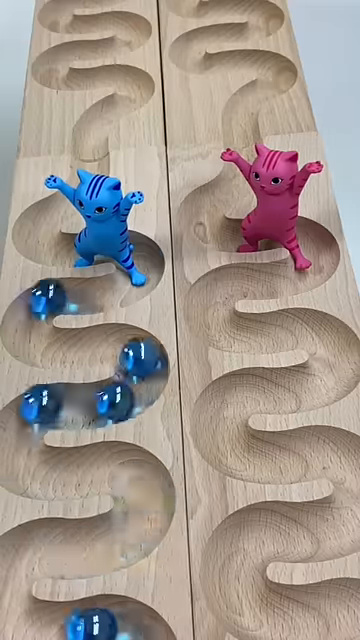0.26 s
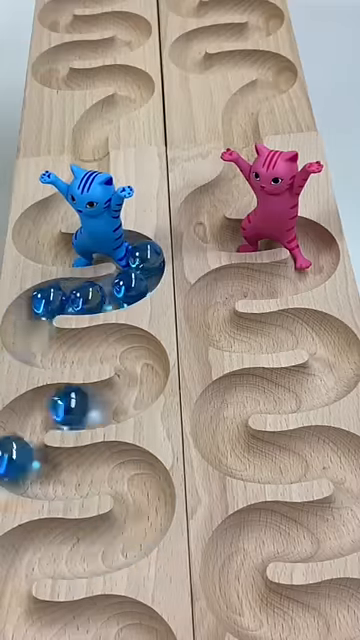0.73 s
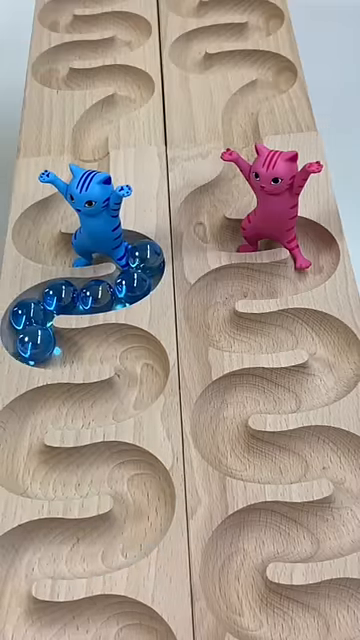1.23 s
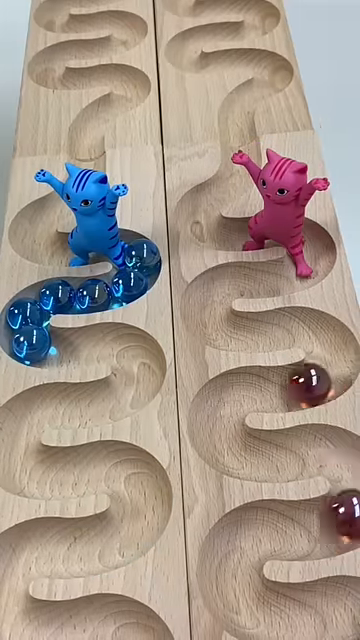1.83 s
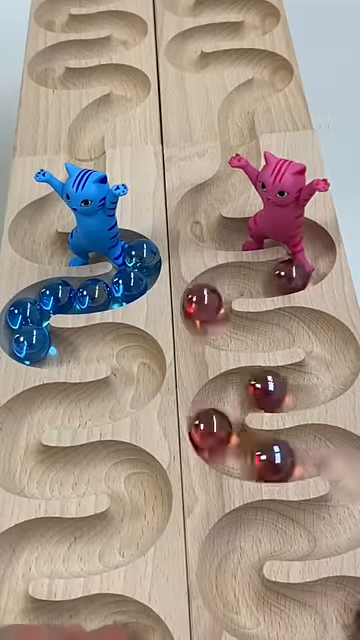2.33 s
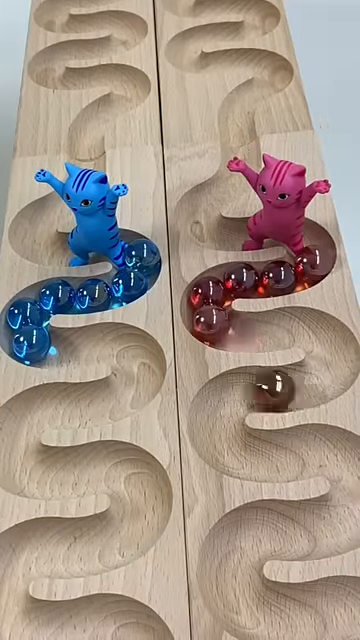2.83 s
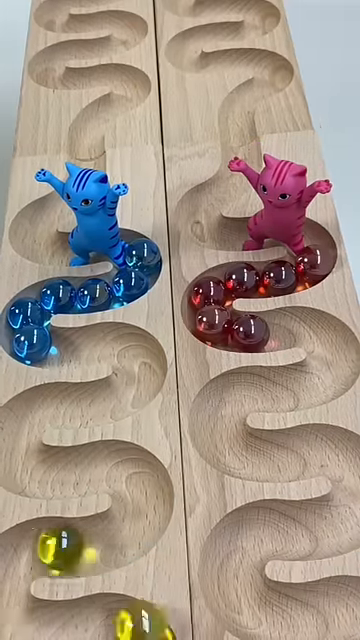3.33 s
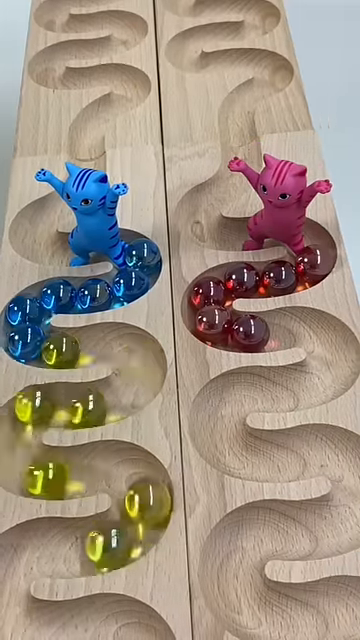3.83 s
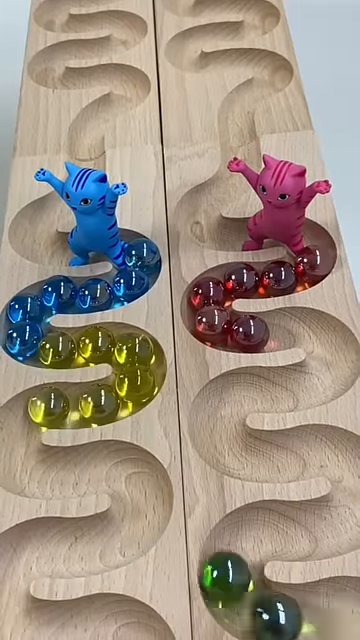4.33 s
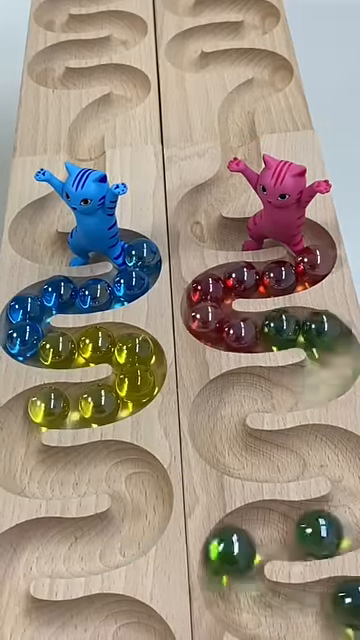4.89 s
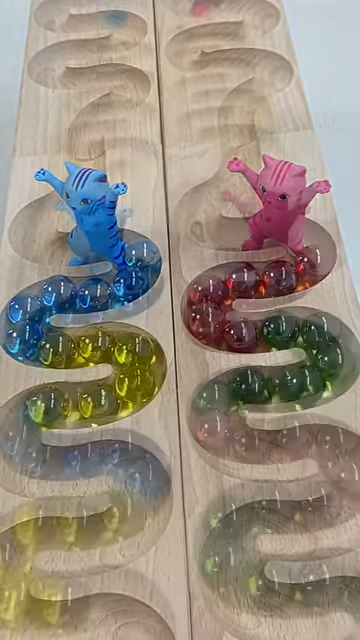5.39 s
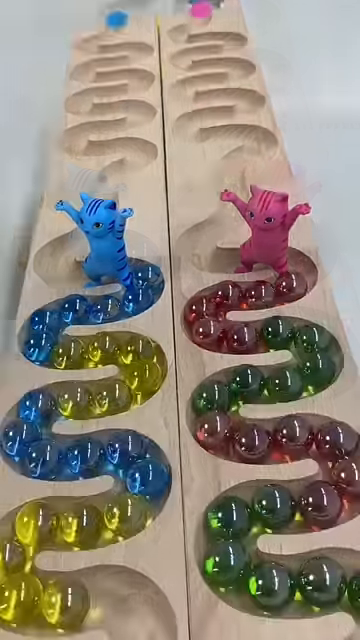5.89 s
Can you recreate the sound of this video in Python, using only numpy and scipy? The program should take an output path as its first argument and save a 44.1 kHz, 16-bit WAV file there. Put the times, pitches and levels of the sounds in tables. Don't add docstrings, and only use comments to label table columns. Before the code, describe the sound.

Close, dry clatter of glass marbles rolling through carved wood, snapping against each other in bursts, then fading into low quiet room air.

```python
import sys
import numpy as np
from scipy import signal
from scipy.fft import rfft, irfft
from scipy.io import wavfile
from scipy.ndimage import uniform_filter1d

SR = 44100
rng = np.random.default_rng(int(sys.argv[2]) if len(sys.argv) > 2 else 0)


def wav_record(signal):
    frames = np.transpose(np.atleast_2d(signal))
    bounded = np.clip(frames, -1, 1)
    quanta = np.round(bounded * 32767).astype(np.int16)
    wavfile.write(sys.argv[1], SR, quanta)


def gain_from_db(level_db):
    decades = np.asarray(level_db, float) / 20
    return 10 ** decades


N = 271215

# frequency in Hz, level in dB per Hz.
AIR = [(25, -64), (76, -11), (113, 10.5), (554, -52), (700, -1.5), (940, -32.5), (4500, -40),
       (14000, -60.5)]
AIR_DB = -58
# frequency in Hz, level in dB per Hz.
LATE_AIR = [(60, -21), (110, -4), (200, -17), (340, -14), (700, -27), (1500, -38), (5000, -41),
            (15000, -66.5)]
LATE_DB, LATE_S = -59, 5.21
LULL_S, LULL_LENGTH_S, LULL_DB = 5.86, 0.038, -3
# time in seconds, level in dB.
THROB = [(5.401, -66), (5.779, -67), (5.821, -55), (5.92, -56.5), (5.969, -70.5), (6.019, -53), (6.15, -59)]
# frequency in Hz, level in dB per Hz.
PORT_AIR = [(100, -7), (800, -4), (3000, -17.5), (11000, -34), (13000, -22), (15500, -36)]
PORT_AIR_DB = -73.5
# frequency in Hz, decay by 60 dB in seconds.
ROOM = [(200, 0.48), (1000, 0.12), (4000, 0.089), (12000, 0.11)]
# frequency in Hz, decay by 60 dB in seconds.
HALL = [(500, 0.2), (3500, 0.13), (12000, 0.3)]
HALL_DB = -30
# frequency in Hz, difference of the ports relative to their sum in dB.
WIDTH = [(100, -29), (400, -23.5), (1000, -14), (1500, -13.5), (2500, -18.5), (6000, -8.5), (10000, -4),
         (14000, 10)]
# frequency in Hz, gain in dB.
MICROPHONE = [(40, -40.5), (140, -11), (210, 1), (12000, -0.5), (13500, -22), (15000, -42), (18000, -58.5)]

BOARD_CHANGES = [1.25, 3.05, 4.15]
# frequency in Hz, bandwidth in Hz, level in dB.
BOARD = [
    [(230, 110, 6), (312.3, 96, 17.5), (382, 38, 8.5), (438, 26, 8), (638, 28, 9), (730, 30, 2),
     (849, 24, 7), (920, 29, 4), (1008, 50, 9.5), (1156, 100, 10), (1271, 25, 10), (1410, 140, 6.5)],
    [(230, 59, 9.5), (305, 30, 12.5), (376, 110, 15.5), (497.7, 48, 12), (543, 110, 7.5), (647, 40, 9.5),
     (854, 50, 6), (1030, 50, 3), (1190, 40, 7.5), (1310, 33, 8), (1434, 88, 6.5), (1560, 320, 3)],
]
# frequency in Hz, bandwidth in Hz, level in dB.
LEFT_WALL = [(2031, 84, 6.5), (2350, 320, 9), (2720, 310, 2), (3396, 150, 6.5), (3670, 1500, -5),
             (1520, 340, -8)]
# frequency in Hz, bandwidth in Hz, level in dB.
RIGHT_WALL = [(2043, 170, 5.5), (2400, 300, 5), (2980, 640, 8.5), (3290, 190, 3.5), (3850, 780, -2),
              (1600, 400, -2)]
WALLS = [LEFT_WALL, RIGHT_WALL]
# frequency in Hz, bandwidth in Hz, level in dB.
GROOVE = [
    [(5000, 100, 2.5), (5480, 130, -0.5), (6720, 270, 6.5), (7750, 915, -24), (9710, 73, -14)],
    [(5170, 200, -10), (5520, 870, 4), (6080, 83, -6.5), (7600, 1400, -26.5), (9000, 450, -12)],
]

# start in seconds, peak in dB.
PRICKS = [(0.7694, -38), (0.8676, -32), (1.1696, -42.5), (1.4229, -33), (1.6821, -31), (1.7057, -25),
          (1.91, -22), (2.161, -55), (2.4562, -24.5), (2.4644, -47), (2.6356, -33), (2.683, -36),
          (2.703, -20), (3.5433, -29), (4.0574, -28), (4.4982, -49), (4.5451, -33), (4.5877, -19),
          (4.6853, -51), (5.2478, -45), (5.3537, -49)]
# start in seconds, level in dB, thump relative to it in dB.
BUMPS = [(2.851, -36, -6), (2.902, -44, -2.5), (2.935, -38.5, -10), (2.953, -37, -11), (2.997, -40, -4.5),
         (3.131, -37, -9), (3.216, -59.5, -16.5), (3.375, -33, -14), (3.459, -34, -7), (5.398, -44, -7.5),
         (5.433, -59, -1), (5.468, -58, -5), (5.58, -60, -12.5), (5.635, -63, -10), (4.806, -45, -13)]
# frequency in Hz, bandwidth in Hz, level in dB.
BUMP_RING = [(1250, 300, -2.5), (2000, 350, 3.5), (2700, 350, -2), (3400, 400, -8), (4180, 800, -15),
             (6800, 500, -14)]
# start in seconds, peak in dB, brightness in dB.
TICKS = [(0.0166, -28, -12), (0.036, -34, -4), (0.055, -32, -11), (0.0992, -24.5, -7), (0.2283, -24.5, -5),
         (0.2434, -25.5, -2), (0.301, -25.5, 2.5), (0.3414, -29, -2), (0.6767, -28.5, -16),
         (0.747, -44, -8), (0.782, -32, -11), (0.816, -30.5, 2), (0.8758, -27, 0), (0.9862, -40, -12.5),
         (1.394, -34, -5), (1.4073, -37, -4), (1.444, -24, -14), (1.4782, -30.5, -14), (1.6104, -21, -6),
         (1.6717, -25, -4), (1.695, -20, -7), (1.7496, -27, 2), (1.7665, -21, -7), (1.8617, -26, 0),
         (1.9068, -23, -1.5), (1.92, -22, 5), (1.9454, -37, -4), (1.9793, -28, 2), (2.0256, -34, -2),
         (2.1092, -23, -1.5), (2.14, -24, -20), (2.2328, -25.5, -13), (2.2483, -29, -4), (2.2697, -27, -6),
         (2.3384, -26, -4), (2.3813, -25, 0), (2.3977, -23, 4), (2.4848, -37, 2), (2.5058, -29, -2),
         (2.5336, -48, -3), (2.567, -34, -9), (2.7966, -29, -6), (3.513, -25.5, -9), (3.616, -30, -13),
         (3.6541, -40, -10), (3.694, -38.5, -12), (3.7824, -31.5, 1), (3.8214, -30, -5), (3.9544, -45, -8),
         (4.308, -30, -1), (4.4084, -27, -2), (4.4257, -23.5, 0), (4.481, -32, -1), (4.535, -28, -11),
         (4.569, -33, -1), (4.717, -35, 0), (4.782, -35, -8), (5.164, -30, -2), (5.1802, -25, -4),
         (5.223, -29, 5)]
# start in seconds, level in dB, brightness in dB.
KNOCKS = [(0.1114, -33, 0), (0.209, -42, 11), (0.2505, -38.5, 5), (0.3166, -40.5, 10.5), (0.896, -34, -3),
          (0.919, -30.5, -2), (1.0085, -37, -6.5), (1.7013, -32, 2), (1.7261, -30.5, -3), (1.8812, -47, 16),
          (1.961, -32, 1.5), (2.0017, -32, -13), (2.322, -27.5, -30), (2.4264, -30.5, 1.5), (2.463, -33, 0),
          (2.584, -31.5, -5), (2.857, -39.5, 14), (3.003, -31.5, -4), (3.2855, -25.5, -13),
          (3.759, -34.5, -4), (3.8586, -33, -1), (4.0356, -24, -12), (4.3307, -31, 0), (4.42, -35, 3),
          (4.5194, -38.5, -4), (4.685, -42.5, 18), (4.923, -25, -8), (5.15, -31, -25), (5.31, -28, -4),
          (0.468, -39.5, 1), (0.728, -38.5, -18), (0.793, -39.5, 0), (0.9419, -35.5, -9),
           (1.993, -48.5, 20), (2.3776, -41, 14), (2.407, -35, -22), (2.803, -39, -1), (2.97, -46, -16),
           (3.254, -44.5, -7.5), (3.5525, -47.5, 16.5), (3.593, -43.5, 7.5), (3.9277, -37, -1),
           (4.274, -36.5, 5), (4.3607, -38.5, 10.5), (4.3822, -33.5, 6), (4.4772, -39, 1),
           (4.7512, -34.5, 3.5), (5.107, -36, 6), (5.285, -34.5, 4)]
# start in seconds, level in dB, scatter relative to it in dB.
DROPS = [
    (4.8123, -14, -5),
    (4.929, -13.5, -3),
    (4.993, -18, -2.5),
    (5.03, -25, -2.5),
    (5.049, -30.5, -0.5),
]
# frequency in Hz, gain in dB.
DROP_COLOUR = [(300, -10), (1200, -8), (3300, 2.5), (5500, 2.5), (7000, -7.5), (10000, -5), (13000, -21.5)]
DROP_SNAP_DB = 4

# time in seconds, level in dB.
ROLL = [(0, -40), (0.6, -42.5), (0.8, -45), (1.069, -45), (1.13, -68), (1.299, -61.5), (1.4, -45.5),
        (1.5, -50.5), (1.95, -41), (2.66, -41.5), (2.92, -54), (3.05, -48.5), (3.2, -55.5), (3.499, -41),
        (4.0, -41.5), (4.3, -46), (4.75, -45), (5.319, -43.5)]
STOP_DB_PER_S, STOP_DEPTH_DB, FADE_DB_PER_S = 146.5, 19, 36.5
WALL_RE_ROLL_DB, WALL_SLOPE, FIZZ_RE_WALL_DB = -8, 5.4, -17.5
# time in seconds, rub in dB, length in seconds, brightness in dB.
BENDS = [(0.368, -49, 0.54, -18), (0.64, -55, 0.048, -11.5), (0.893, -51, 0.2, -19), (1.332, -49, 0.012, 9),
         (1.76, -48.5, 0.16, -11.5), (1.92, -52, 0.11, -5), (2.043, -41.5, 0.052, -12),
         (2.343, -48.5, 0.14, -7.5), (2.676, -48.5, 0.19, -19), (3.4, -41, 0.14, 2),
         (3.725, -48.5, 0.3, -15), (3.966, -47.5, 0.25, -12), (4.372, -50, 0.095, -27.5),
         (4.668, -47.5, 0.16, -14), (4.85, -49, 0.18, -4.5), (5.094, -52, 0.27, -3.5),
         (5.284, -55, 0.29, -8.5), (5.593, -72, 0.35, -19)]
# frequency in Hz, level in dB per Hz.
SEETHE = [(1200, -13.5), (3000, -6), (6000, -10.5), (8000, -11.5), (9700, -0.5), (12300, -12.5),
          (13300, -46)]
SEETHE_DB, SEETHE_SLOPE = -74.5, 0.53
SEETHE_TOP_SLOPE, SEETHE_SPLIT_HZ = 2.0, 6500

# start in seconds, level in dB.
SNAPS = [(0.123, -32.5), (0.6858, -36.5), (1.009, -26), (1.0387, -27), (1.088, -35), (1.331, -33),
         (1.4633, -32), (1.9908, -33.5), (2.4257, -29.5), (2.6568, -28), (2.6733, -36), (2.6795, -23),
         (3.0222, -24), (3.2893, -23.5), (3.8364, -28.5), (3.858, -27.5), (3.9715, -24), (3.9883, -42),
         (3.9957, -23), (4.5838, -28), (4.898, -30.5), (4.8827, -31), (4.9408, -31), (4.9977, -36),
         (5.2695, -30.5), (5.309, -23.5), (5.3308, -30), (5.3889, -22.5)]
# frequency in Hz, gain in dB.
SNAP_SUM = [(60, -23), (1500, -9), (4000, -17), (8000, -14), (11000, -6.5), (13000, -8.5), (14500, -17),
            (17000, -49.5)]
# frequency in Hz, gain in dB.
SNAP_DIFF = [(6000, -38.5), (9000, -35), (11500, -15.5), (14000, -7), (16000, -3.5), (17200, -33.5)]
# frequency in Hz, gain in
# dB.
SNAP_TAIL = [(1000, 1), (12500, -2.7), (13600, -23.5), (17000, -35)]
# start in seconds, hollow knock, low, high and upper ring in dB.
LEFT_CLACKS = [(0.0727, -53, -52, -49.5, -78.5), (0.1492, -40, -27.5, -33, -32),
               (0.1753, -41.5, -36.5, -47.5, -47.5), (0.1915, -46.5, -41, -50, -61.5),
               (0.2224, -52, -49, -55, -83), (0.502, -51.5, -58, -52.5, -96),
               (0.529, -44.5, -47.5, -61, -53.5), (3.0905, -41.5, -62.5, -37.5, -42.5),
               (3.0958, -40.5, -36, -41.5, -38.5), (3.3068, -34.5, -28.5, -33, -37),
               (3.3112, -38, -32.5, -44, -49), (3.3264, -41.5, -34, -43.5, -36.5),
               (3.3343, -47, -53, -37, -45), (3.3509, -46, -29.5, -38, -29),
               (3.3637, -47.5, -42, -52, -54.5), (3.382, -39.5, -32, -37, -35),
               (3.3898, -49, -58.5, -48.5, -62), (3.421, -41, -40, -53, -50.5),
               (3.442, -38.5, -36.5, -44.5, -43.5), (3.4731, -56, -39, -48, -48),
               (3.479, -45.5, -41.5, -46, -50), (3.7173, -53, -51, -46, -72), (3.889, -53, -56, -54, -79),
               (4.1193, -41, -62, -52, -58), (4.123, -50, -58, -41, -50), (4.1318, -49, -59, -39.5, -52)]
# start in seconds, hollow knock, low, high and upper ring in dB.
RIGHT_CLACKS = [(1.3351, -42, -48.5, -44, -43), (1.3426, -43, -37.5, -49, -60.5),
                (1.5274, -36.5, -31, -36.5, -28), (1.5641, -37.5, -49, -34.5, -27),
                (1.5882, -44.5, -32.5, -34.5, -51), (1.6016, -40.5, -36.5, -31, -33.5),
                (1.6392, -44, -51, -44.5, -78), (1.7763, -43.5, -35, -54, -39), (1.783, -58, -33, -54, -39),
                (1.8212, -44, -37.5, -39, -46.5), (1.8284, -49, -39.5, -57, -62),
                (2.176, -36, -51, -44, -60), (2.1825, -48, -39, -61, -51),
                (4.1636, -39.5, -31.5, -36.5, -44), (4.1775, -51, -64, -37, -35.5),
                (4.1952, -47, -50, -37.5, -45), (4.2066, -54, -46, -41, -48),
                (4.2164, -48.5, -60, -49.5, -66), (4.5936, -48, -31, -39.5, -32),
                (4.6023, -41, -46.5, -48, -53.5), (4.606, -48, -34.5, -38, -45.5),
                (4.6167, -39, -48.5, -48, -51.5), (4.6296, -46, -40, -52.5, -49)]
# start in seconds, hollow knock in dB, glass snap in dB.
PILE = [(0.38, -21.5, -56), (0.5503, -28, -31), (0.5799, -23.5, -31), (0.6036, -18.5, -21),
        (1.0521, -24.5, -23.5), (1.0777, -25, -26.5), (1.4543, -27.5, -25.5), (2.605, -25, -20.5),
        (2.6308, -22, -27), (2.7068, -21, -21), (2.7241, -24.5, -29.5), (3.0415, -25.5, -30.5),
        (3.061, -20, -24), (3.9856, -23.5, -26.5), (4.0488, -33, -28), (4.1012, -27.5, -20.5),
        (4.91, -23, -25)]
# frequency in Hz, bandwidth in Hz.
CLACK_RINGS = [
    [(2850, 330), (5530, 230), (6700, 290)],
    [(3000, 330), (5620, 260), (6180, 310)],
]
UPPER_RING_HZ = [9700, 9250, 9790, 9220]
UPPER_WIDTH_HZ, QUEUE_KNOCK_HZ = 230, 3150
SNAP_RE_UPPER_DB, CRACK_RE_RING_DB, THUMP_RE_KNOCK_DB = 18, -2.5, -3
PILE_KNOCK_DB, PILE_RING_DB, PILE_TOP_DB = -22.5, -41, -39.5
# frequency in Hz, gain in dB.
CRACK_TICK = [(600, -24.5), (1500, -4.5), (3000, 1.5), (6000, -22), (9500, -15), (12500, -8.5)]


def evened(x):
    return x / np.sqrt(np.mean(x ** 2) + 1e-20)


def read(points, hz):
    f, value = np.transpose(points)
    return np.interp(np.log(hz + 1), np.log(f + 1), value)


def add(mix, s, sound):
    part = mix[round(s * SR):][:len(sound)]
    part += sound[:len(part)]


def causal(points, size=2048):
    hz = abs(np.fft.fftfreq(size, 1 / SR))
    log_gain = np.log(gain_from_db(np.maximum(read(points, hz), -100)))
    return np.fft.ifft(np.exp(log_gain - 1j * signal.hilbert(log_gain).imag)).real[:size // 2]


def colour(x, points):
    return signal.oaconvolve(x, causal(points))[:N]


def noise(points):
    gain = gain_from_db(read(points, np.fft.rfftfreq(N + 1, 1 / SR)))
    return evened(irfft(rfft(rng.standard_normal(N + 1)) * gain)[:N])


def ring(modes, size=3000, rise_s=0.000052, order=1, signs=1):
    t = np.arange(size) / SR
    out = np.zeros(size)
    for k, (hz, width, db) in enumerate(modes):
        decay = np.sqrt(width) * np.exp(-np.pi * width * t)
        out += signs ** k * gain_from_db(db) * decay * np.sin(2 * np.pi * hz * t)
    return (1 - np.exp(-t / rise_s)) ** order * out


def contacts(draw, length_s):
    t = np.arange(len(draw)) / SR
    burst = draw * abs(draw) * np.exp(-t / length_s) * np.minimum(t / (0.48 * length_s), 1)
    return burst / np.linalg.norm(burst)


def board_at(t):
    return np.searchsorted(BOARD_CHANGES, t) % 2


def room(x, decay):
    taps = np.zeros((2, SR // 2))
    at = np.arange(100, SR // 2 - 20, 20) + rng.integers(0, 20, (2, (SR // 2 - 101) // 20))
    np.put_along_axis(taps, at, rng.choice([-1., 1.], at.shape), 1)
    hz, t, z = signal.stft(taps, SR, nperseg=256)
    tail = signal.istft(z * gain_from_db(-60 * t / read(decay, hz)[:, None]), SR, nperseg=256)[1]
    return signal.fftconvolve(x[None], tail / np.linalg.norm(tail[0]), axes=1)[:, :N]


def shifting_room(x, count=4):
    turn = np.arange(N) / SR * 9 % count
    out = np.zeros((2, N))
    for k in range(count):
        distance = abs((turn - k + count / 2) % count - count / 2)
        out += room(x * np.cos(np.pi / 2 * np.minimum(distance, 1)), ROOM)
    return out


def background():
    t = np.arange(N) / SR
    late = np.clip((t - LATE_S) / 0.5, 0, 1)
    lull = gain_from_db(LULL_DB * np.exp(-((t - LULL_S) / LULL_LENGTH_S) ** 2))
    air = gain_from_db(AIR_DB) * noise(AIR) * np.sqrt(1 - late)
    air += gain_from_db(LATE_DB) * noise(LATE_AIR) * np.sqrt(late) * lull
    hiss = noise([(2500, -20.0), (5000, 5.0), (7500, -14.0), (10500, 3.5), (13500, -16.5),
                  (15500, -5.5), (16300, -31.5)])
    air += gain_from_db(np.interp(t, [5.85, 6.06], [-100, -74])) * hiss
    s, db = np.transpose(THROB)
    deep = np.sin(2 * np.pi * 57 * t + 0.82 * np.sin(2 * np.pi * 7 * t))
    return air + deep * gain_from_db(np.interp(t, s, db + 2.5, left=-90))


def drops():
    out, t = np.zeros((2, N)), np.arange(6000) / SR
    for s, db, scatter_db in DROPS:
        envelope = np.exp(-(t / 0.0031) ** 4) + gain_from_db(scatter_db - 60 * t / 0.12)
        for k in range(2):
            scatter = np.convolve(rng.standard_normal(6000), causal(DROP_COLOUR))[:6000]
            add(out[k], s, gain_from_db(db) * envelope * evened(scatter))
        add(out[0], s + 0.0032, gain_from_db(db - 21.0) * evened(ring(BOARD[1], signs=-1)))
    return out


def pricks():
    out = np.zeros(N)
    for s, db in PRICKS:
        add(out, s, gain_from_db(db + 12.5) * contacts(rng.standard_normal(80), 0.00092))
    return out


def bumps():
    out = np.zeros(N)
    for s, db, thump_db in BUMPS:
        uneven = rng.standard_normal(len(BUMP_RING))
        modes = [(hz, w, level + 1.4 * d) for (hz, w, level), d in zip(BUMP_RING, uneven)]
        rings = ring(modes, size=1000, rise_s=0.0001, order=2, signs=-0.9)
        add(out, s, gain_from_db(db - 21.5) * np.convolve(contacts(rng.standard_normal(120), 0.0011), rings))
        thump = evened(ring(BOARD[board_at(s)], signs=-1.01))
        add(out, s + 0.002, gain_from_db(db + thump_db - 6.5) * thump)
    return out


def ticks():
    out = np.zeros(N)
    for s, db, bright_db in TICKS:
        wall, groove = WALLS[board_at(s)], GROOVE[board_at(s)]
        detune = 1 + 0.015 * rng.standard_normal(len(wall))
        modes = [(hz * d, 1.4 * w, level) for (hz, w, level), d in zip(wall, detune)]
        modes += [(hz, 1.2 * w, level + bright_db) for hz, w, level in groove]
        uneven = rng.standard_normal(len(modes))
        modes = [(hz, w, level + 1.0 * d) for (hz, w, level), d in zip(modes, uneven)]
        rings = ring(modes, size=1000, rise_s=0.00012, order=2)
        add(out, s, gain_from_db(db - 36.0) * np.convolve(contacts(rng.standard_normal(120), 0.0024), rings))
    return out


def knocks():
    out = np.zeros(N)
    for s, db, bright_db in KNOCKS:
        groove = [(hz, w, level + bright_db) for hz, w, level in GROOVE[board_at(s)]]
        modes = WALLS[board_at(s)] + groove
        uneven = rng.standard_normal(len(modes))
        modes = [(hz, 0.82 * w, level + 2.8 * d) for (hz, w, level), d in zip(modes, uneven)]
        rings = ring(modes, size=1000, rise_s=0.00009, order=2)
        add(out, s, gain_from_db(db - 28.0) * np.convolve(contacts(rng.standard_normal(120), 0.0012), rings))
    return out


def grain(per_s, spread_db):
    draw = rng.random((N, 3))
    size_db = spread_db * np.minimum(-np.log(draw[:, 0] + 1e-9), 4.2)
    size = gain_from_db(size_db) * (draw[:, 1] < per_s / SR)
    return size, np.floor(draw[:, 2] * 2.5 + np.arange(N) / SR * 6) % 8


def patter(size, spot, modes, detune, count=8, signs=1):
    out = np.zeros(N)
    for k in range(count):
        mix = rng.standard_normal((len(modes), 2))
        local = [(hz * (1 + detune * a), w, db + 3 * b) for (hz, w, db), (a, b) in zip(modes, mix)]
        shape = ring(local, rise_s=0.0002, order=2, signs=signs)
        out += signal.oaconvolve(size * (spot % count == k), shape / np.linalg.norm(shape))[:N]
    return evened(out)


def seethe(effort):
    t = np.arange(N) / SR
    fade = np.clip((ROLL[-1][0] + 0.76 - t) / 0.37, 0, 1)
    hiss = gain_from_db(SEETHE_DB + SEETHE_SLOPE * (effort + 44.0)) * fade * noise(SEETHE)
    top = signal.sosfilt(signal.butter(2, SEETHE_SPLIT_HZ, "high", fs=SR, output="sos"), hiss)
    slack_db = np.minimum(uniform_filter1d(effort, size=2000) + 45.0, 0) * (t > 1.4)
    hiss += (gain_from_db(SEETHE_TOP_SLOPE * slack_db) - 1) * top
    flutter = uniform_filter1d(uniform_filter1d(rng.standard_normal(N), size=900), size=900)
    return hiss * gain_from_db(3.0 * evened(flutter))


def rolling():
    t = np.arange(N) / SR
    s, db = np.transpose(ROLL)
    after = np.maximum(t - s[-1], 0)
    effort = np.interp(t, s, db) - np.minimum(STOP_DB_PER_S * after, STOP_DEPTH_DB + FADE_DB_PER_S * after)
    wall_gain = gain_from_db(WALL_RE_ROLL_DB - 42.5 + WALL_SLOPE * (effort + 40))
    wall_gain += gain_from_db(effort - 16.5)
    fizz_gain = wall_gain * gain_from_db(FIZZ_RE_WALL_DB)
    for at, rub_db, length, bright_db in BENDS:
        swell = gain_from_db(rub_db) * np.exp(-(2 * (t - at) / length) ** 2)
        wall_gain += swell
        fizz_gain += gain_from_db(bright_db) * swell
    board = board_at(t)
    rough = grain(3000, 3.4)
    fine = grain(3500, 5.7)
    rumble = np.choose(board, [patter(*rough, modes, 0.025, signs=-0.99) for modes in BOARD])
    fizz = np.choose(board, [patter(*fine, modes, 0.012, count=4) for modes in GROOVE])
    wall = np.choose(board, [patter(*fine, modes, 0.045) for modes in WALLS])
    return gain_from_db(effort) * rumble + wall_gain * wall + fizz_gain * fizz + seethe(effort)


def blows():
    rows = []
    for s, *levels in LEFT_CLACKS + RIGHT_CLACKS:
        knock_hz = CLACK_RINGS[board_at(s)][0][0]
        rows.append((s, knock_hz, *levels, levels[-1] + SNAP_RE_UPPER_DB))
    for s, db, snap_db in PILE:
        ring_db = db + PILE_RING_DB
        rows.append((s, QUEUE_KNOCK_HZ, db + PILE_KNOCK_DB, ring_db, ring_db, snap_db + PILE_TOP_DB, snap_db))
    return rows


def snaps():
    out = np.zeros(N)
    in_blows = [(row[0], row[-1]) for row in blows()]
    in_drops = [(s, db + DROP_SNAP_DB) for s, db, _ in DROPS]
    for s, db in SNAPS + in_blows + in_drops:
        add(out, s, gain_from_db(db + 21.5) * contacts(rng.standard_normal(80), 0.0004))
    return out


def clacks():
    rings, cracks = np.zeros((2, N))
    tick = evened(causal(CRACK_TICK)[:400])
    thumps = [evened(ring(modes, signs=-1.002)) for modes in BOARD]
    for s, hz, knock_db, low_db, high_db, top_db, _ in blows():
        knock_off, crack_off, crack_top_off, thump_off = rng.standard_normal(4)
        (_, knock_w), low, high = CLACK_RINGS[board_at(s)]
        top_hz = UPPER_RING_HZ[np.searchsorted(BOARD_CHANGES, s)]
        modes = [(hz * (1 + 0.064 * knock_off), knock_w, knock_db + 3.0), (*low, low_db + 2.5),
                 (*high, high_db + 4.5), (top_hz, UPPER_WIDTH_HZ, top_db + 3.0)]
        add(rings, s, ring(modes, size=1500, rise_s=0.00027, order=2))
        crack_modes = [(4600, 2000, -3), (4200 * (1 + 0.35 * crack_off), 1300, -4.5),
                       (7600 * (1 + 0.12 * crack_top_off), 800, -6.5), (11000, 900, -12)]
        crack = ring(crack_modes, size=400) + gain_from_db(-1.5) * tick
        crack_db = max(knock_db, low_db, high_db) + CRACK_RE_RING_DB
        add(cracks, s, gain_from_db(crack_db) * np.convolve(contacts(rng.standard_normal(200), 0.0015), crack))
        thump_db = knock_db + THUMP_RE_KNOCK_DB + 3.1 * thump_off
        add(rings, s + 0.002588, gain_from_db(thump_db) * thumps[board_at(s)])
    return rings, cracks


def scene():
    glass, drop = snaps(), drops()
    tail = gain_from_db(-2.0) * room(glass, ROOM)
    rings, cracks = clacks()
    rest = knocks() + ticks() + rolling() + bumps()
    near = colour(rings + cracks + rest, MICROPHONE)
    spread = colour(gain_from_db(-2.0) * rings + gain_from_db(3.5) * cracks + rest, MICROPHONE)
    wet = shifting_room(spread) + gain_from_db(HALL_DB + 6) * room(spread, HALL)
    glass = glass + pricks()
    mid = near + gain_from_db(-9.5) * wet[0] + background()
    mid += colour(glass + colour(tail[0], SNAP_TAIL), SNAP_SUM)
    side = colour(-0.6 * mid + gain_from_db(-13.0) * wet[1], WIDTH)
    side += colour(glass + tail[1], SNAP_DIFF) + gain_from_db(PORT_AIR_DB) * noise(PORT_AIR)
    mid += colour(drop[0], MICROPHONE)
    side += gain_from_db(-8.5) * colour(drop[1], MICROPHONE)
    return np.array([mid + side, mid - side])


def band_limit(x):
    return signal.sosfilt(signal.butter(12, 16990, fs=SR, output="sos"), x)


def record(dry):
    overloaded = 0.92 * np.tanh(dry / 0.92)
    limited = signal.oaconvolve(overloaded, signal.firwin(255, 16800, fs=SR)[None], "same")
    limited = signal.sosfilt(signal.butter(2, 32, "high", fs=SR, output="sos"), limited)
    return band_limit(limited)


dry = scene()
out = record(dry)
wav_record(out)
```